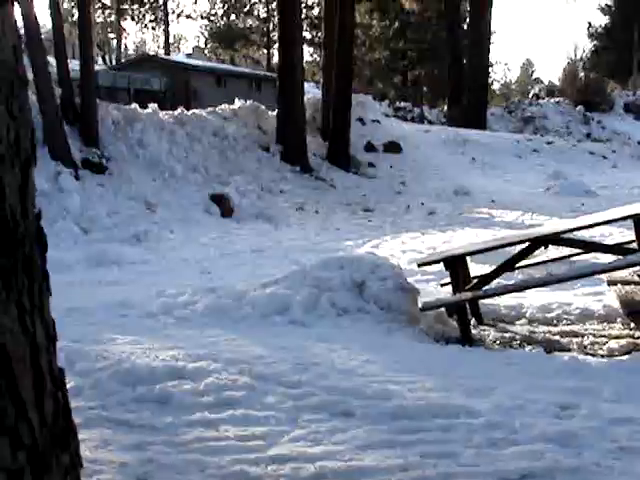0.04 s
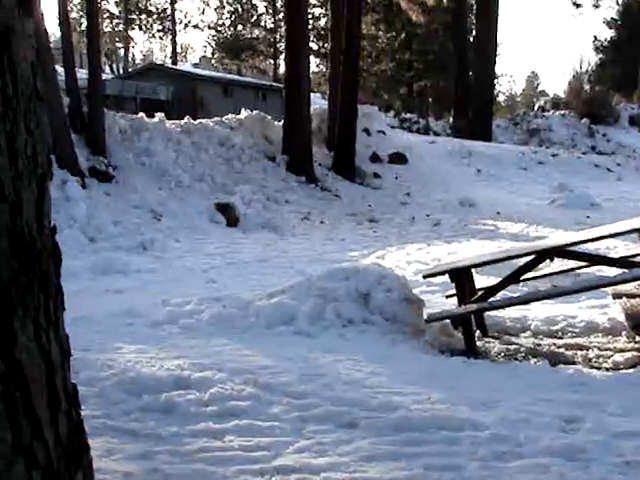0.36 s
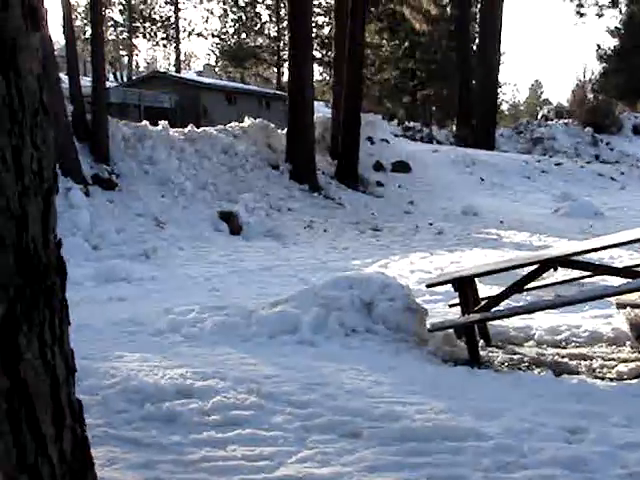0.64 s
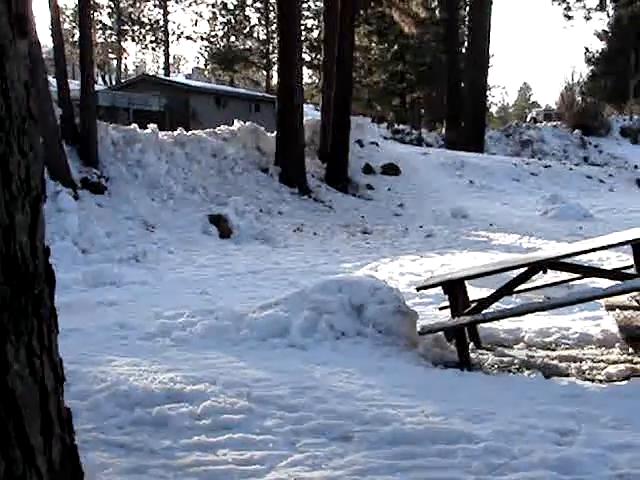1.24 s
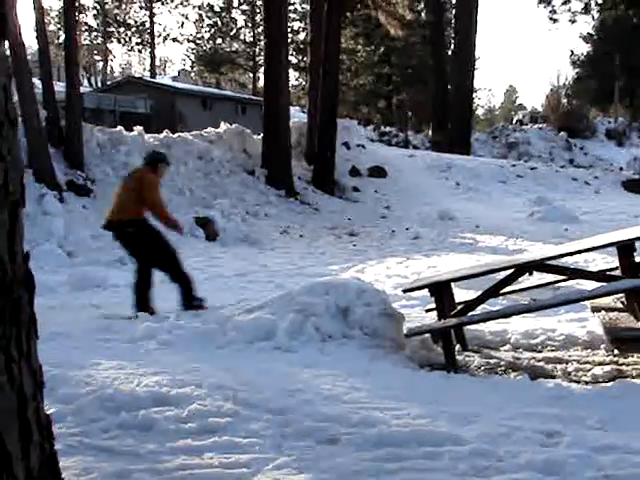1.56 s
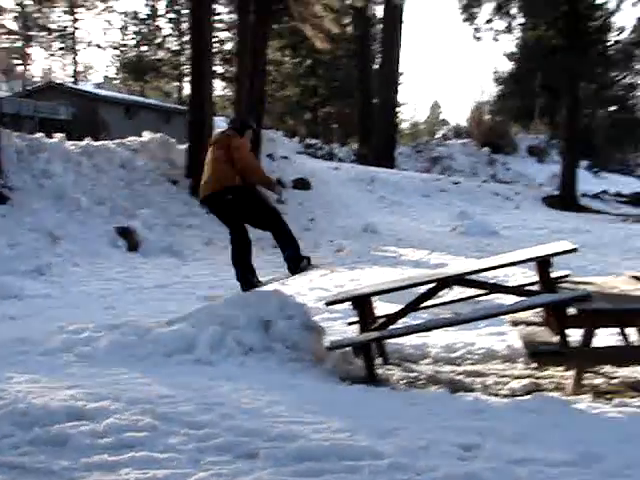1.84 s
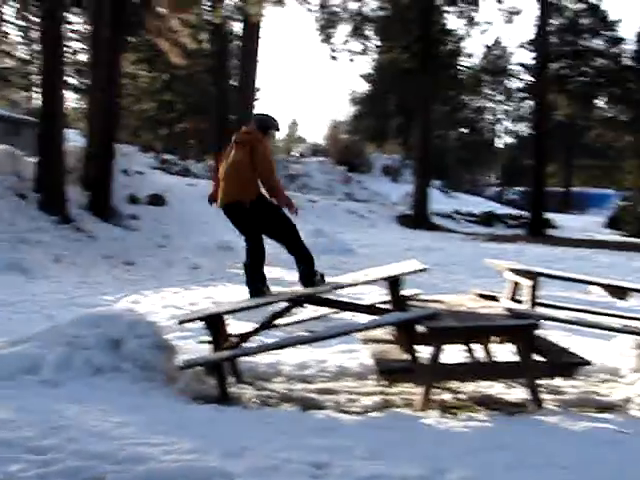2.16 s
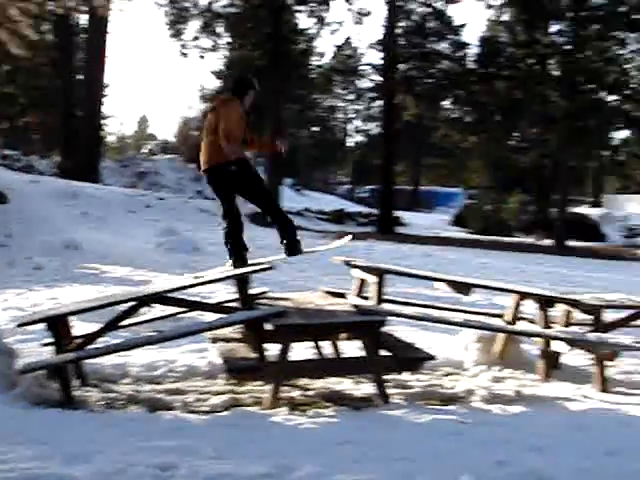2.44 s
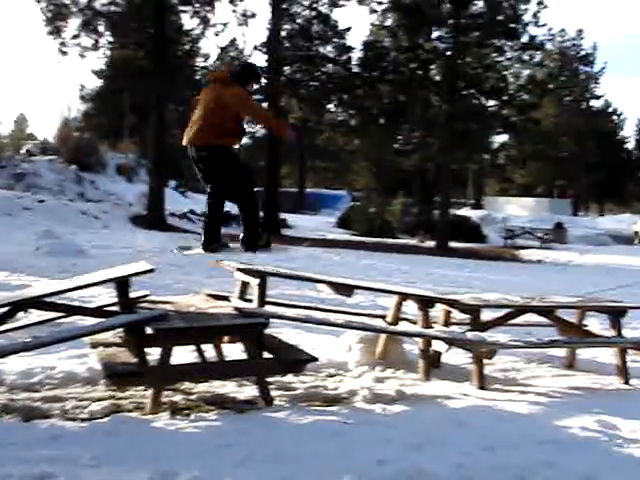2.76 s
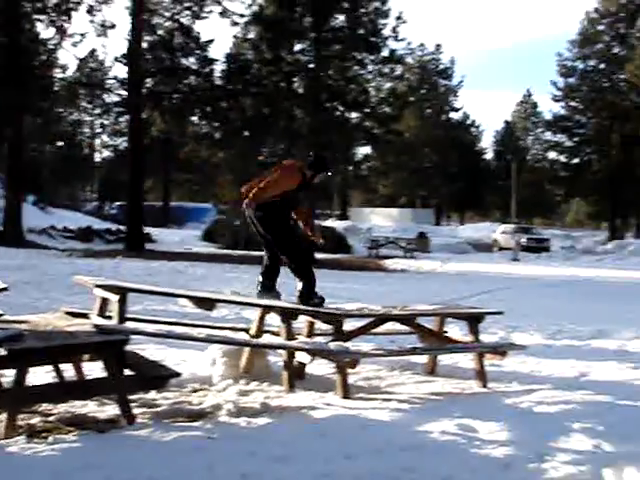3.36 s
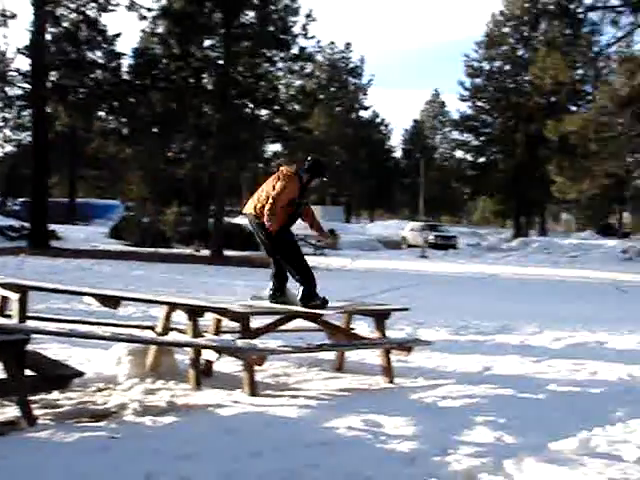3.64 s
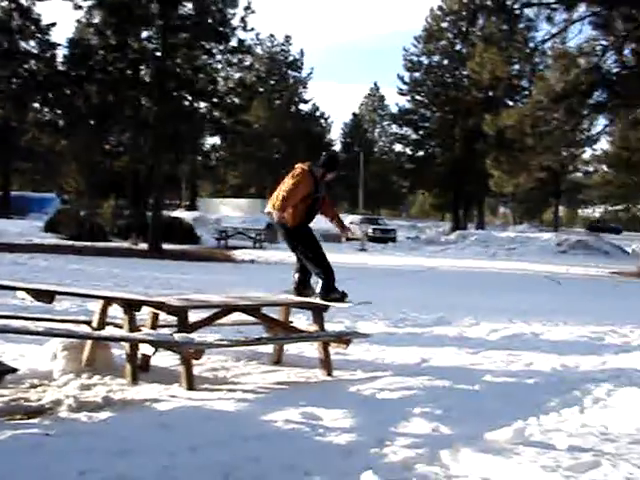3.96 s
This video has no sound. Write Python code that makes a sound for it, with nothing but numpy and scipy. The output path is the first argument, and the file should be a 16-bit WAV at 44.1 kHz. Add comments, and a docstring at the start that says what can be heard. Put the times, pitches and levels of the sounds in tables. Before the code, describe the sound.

A snowboard scrapes over crusty snow, then slaps onto wooden tables and grinds along them.

```python
"""A snowboard slaps down on a wooden picnic table, slides along it, hops to a second and grinds over its
rattling planks: the base sticks and slips, the edge rasps, the wood rings. Before that it crumbles
crusty snow on the run-in and scrapes up a kicker's icy lip. Outdoors, with a steady rush behind,
on one small mono recorder that overloads on the landing."""
import sys
import numpy as np
from scipy import signal
from scipy.fft import rfft, irfft
from scipy.io import wavfile

SR = 44100
rng = np.random.default_rng(int(sys.argv[2]) if len(sys.argv) > 2 else 0)


def wrap_up_sound(samples):
    """Save the sound to the file named by the first command line argument, as 16-bit audio."""
    columns = np.atleast_2d(samples).T
    # keep every value between -1 and 1, then stretch to whole-number steps
    tamed = np.clip(columns, -1, 1)
    steps = np.round(tamed * 32767).astype(np.int16)
    wavfile.write(sys.argv[1], SR, steps)


N = 176400
T = np.arange(N) / SR
ATTACK_S, JUDDER_HZ = .002, 36.7
GRAINS_PER_S, SNOW_GRAIN_DB, WOOD_GRAIN_DB = 12000, 3.5, 2.5


def from_db(db):
    """Decibels to gain."""
    return 10 ** (np.asarray(db) / 20)


def rms_one(x):
    """Scale to unit rms."""
    return x / np.sqrt(np.mean(x ** 2) + 1e-20)


def level(rows):
    """Gain over time from rows of t/s, level/dB."""
    s, db = np.transpose(rows)
    return from_db(np.interp(T, s, db))


def colour(x, spectrum):
    """Shape a signal by rows of f/Hz, relative level/dB; rms 1."""
    hz, db = np.transpose(spectrum)
    f = np.maximum(np.arange(N // 2 + 1) * SR / N, 1)
    skirts = np.minimum(1, f / hz[0]) * np.minimum(1, hz[-1] / f) ** 2
    gain = from_db(np.interp(np.log(f), np.log(hz), db))
    return rms_one(irfft(rfft(x) * skirts * gain, N))


def noise(spectrum):
    """Coloured noise; rms 1."""
    return colour(rng.standard_normal(N), spectrum)


def drift(rate_hz):
    """Random wavering, mostly slower than the rate; rms 1."""
    f = np.arange(N // 2 + 1) * SR / N
    return rms_one(irfft(rfft(rng.standard_normal(N)) / (1 + (f / rate_hz) ** 2), N))


def grains(spread_db):
    """Dense tiny fractures and slips of uneven size; rms 1."""
    sizes = from_db(spread_db * np.minimum(rng.exponential(1, N), 5)) * rng.choice([-1, 1], N)
    return rms_one(sizes * (rng.random(N) < GRAINS_PER_S / SR))


def burst(s, hold, decay):
    """Envelope: quick attack, hold, exponential release."""
    return np.clip((T - s) / ATTACK_S, 0, 1) * np.exp(-np.maximum(T - s - hold, 0) / decay)


def swell(s, length):
    """Smooth rise and fall around a moment."""
    return np.exp(-2 * ((T - s) / length) ** 2)


def ring(force, modes, ring_db=-8.5):
    """Contact force plus the ringing of the body that it drives."""
    out = force.copy()
    for hz, db, t60 in modes:
        r = np.exp(-np.log(1000) / (t60 * SR))
        zeros = np.array([1, 0, -1]) * (1 - r * r) / 2
        poles = [1, -2 * r * np.cos(2 * np.pi * hz / SR), r * r]
        out += from_db(db + ring_db) * signal.lfilter(zeros, poles, force + 1e-18)
    return out / (1 + from_db(ring_db) / 5)


# Open air behind the rider, and wind right on the microphone: f/Hz, level/dB
AIR_SPECTRUM = [(30, -20), (90, -15.5), (200, -21.5), (350, -9.5), (480, -7), (830, 1), (1380, -3.5),
                (2000, -9), (2700, -17.5), (4000, -26.5), (5500, -45), (8000, -58), (10000, -55)]
WIND_SPECTRUM = [(25, -1), (60, -3), (110, -15), (250, -30)]
# Gusts at the microphone: t/s, level/dB
GUST_LEVEL = [(2.165, -80), (2.18, -34), (2.2, -34), (2.25, -87), (3.41, -76), (3.46, -43), (3.485, -45),
              (3.52, -40.5), (3.57, -47), (3.65, -44), (3.73, -51), (3.78, -45), (3.89, -45), (3.93, -71)]
def air():
    """A steady outdoor rush, and low puffs that buffet the microphone."""
    rush = noise(AIR_SPECTRUM) * from_db(-31.5 + 1.5 * drift(rate_hz=31))
    buffeting = noise(WIND_SPECTRUM) * level(GUST_LEVEL) * from_db(3.4 * drift(rate_hz=13))
    return rush + buffeting


# Ticks close to the microphone: t/s, level/dB, decay/s
CLOSE_TICKS = [(0.114, -30.5, 0.00035), (0.1486, -12.5, 0.00034)]
# Their partials: f/Hz
TICK_PARTIALS = [1800, 3900, 6330]
def ticks():
    """Very short dry snaps."""
    out = 0
    for s, db, decay in CLOSE_TICKS:
        age = np.maximum(T - s, 0)
        tone = sum((-1) ** k * np.sin(2 * np.pi * hz * age) for k, hz in enumerate(TICK_PARTIALS))
        out = out + from_db(db) * np.exp(-age / decay) * tone
    return out


# Crust on the run-in, soft snow, the kicker's lip, the flexing board: f/Hz, level/dB
CRUST_SPECTRUM = [(60, -35), (170, -12.5), (330, -10.5), (650, -0.5), (1300, -1.5), (2200, -1.5),
                  (3600, -3.5), (4400, -5.5), (5800, -8), (8000, -14), (10000, -23)]
SCUFF_SPECTRUM = [(300, -21), (650, -3.5), (1400, 0.5), (2100, 2), (4000, -16)]
LIP_SPECTRUM = [(150, -17), (450, -9), (700, 3), (1250, -2), (2000, -20), (3600, -6.5), (4500, -18.5),
                (10000, -34)]
RUMBLE_SPECTRUM = [(80, -15), (120, -6), (172, -2), (230, -6.5), (400, -11), (900, -44)]
# Push on the crust and the lip, spray between the tables, rumble over lumps and planks: t/s, level/dB
CRUST_PUSH = [(.47, -49.5), (.5, -32), (.56, -41), (.65, -34.5), (.79, -38.5), (.89, -33.5), (1.1, -34.5),
              (1.23, -29), (1.7, -30), (1.85, -26.5), (1.92, -35.5), (1.97, -37), (2.06, -26.5),
              (2.13, -35), (2.155, -45), (2.18, -84)]
ICE_PUSH = [(1.99, -61), (2.03, -42), (2.07, -27), (2.13, -22), (2.16, -45), (2.18, -87)]
SPRAY_LEVEL = [(2.7, -84), (2.74, -47), (2.81, -47), (2.825, -37), (2.92, -33.5), (2.95, -41.5),
               (2.98, -74)]
BOARD_RUMBLE = [(.6, -45), (.72, -36), (.8, -62), (.88, -34), (.99, -41), (1.1, -52), (1.25, -35),
                (1.35, -44.5), (1.47, -38.5), (1.7, -48), (1.85, -35.5), (1.95, -56), (2.08, -46),
                (2.17, -66), (3.3, -64), (3.6, -38.5), (3.67, -30.5), (3.76, -46), (3.9, -59)]
# Patches of softer snow on the run-in: t/s, level/dB, length/s
SOFT_PATCHES = [(0.6, -32, 0.062), (0.947, -34, 0.076), (1.284, -33, 0.19)]
# Ringing of the steel edge on the crust and of the board on the lip: f/Hz, level/dB, t60/s
STEEL_MODES = [(2670, 2, 0.035)]
DECK_MODES = [(716, -7, .03), (900, -4, .04), (1130, -4, .05), (1280, -1, .06), (2780, -2, .05),
              (3550, 3, .02)]
def snow_ride():
    """The juddering board crumbles crust, throws spray, ploughs soft snow, scrapes ice and rumbles."""
    hiss = ring(colour(grains(SNOW_GRAIN_DB), CRUST_SPECTRUM) * level(CRUST_PUSH), STEEL_MODES)
    spray = colour(grains(SNOW_GRAIN_DB), CRUST_SPECTRUM) * level(SPRAY_LEVEL)
    ploughing = sum(from_db(db) * swell(s, length) for s, db, length in SOFT_PATCHES)
    scuffs = colour(grains(spread_db=2.5), SCUFF_SPECTRUM) * ploughing
    lip = ring(colour(grains(SNOW_GRAIN_DB), LIP_SPECTRUM) * level(ICE_PUSH), DECK_MODES)
    rumble = noise(RUMBLE_SPECTRUM) * level(BOARD_RUMBLE)
    judder = from_db(1.1 * drift(JUDDER_HZ))
    return (hiss + spray + scuffs + lip + rumble) * judder


# Drops along the run-in: t/s, level/dB, hold/s, decay/s, crunch/dB
SNOW_DROPS = [(.043, -27.5, 0.0051, 0.035, -44.5), (0.063, -32, 0.0041, 0.062, -48),
              (0.4788, -18, 0.0087, 0.016, -33.5), (0.696, -25.5, 0.0064, 0.041, -54),
              (0.85, -30.5, 0.01, 0.048, -55), (1.732, -23, 0.0042, 0.0027, -28.5)]
# Their dull body: f/Hz, level/dB
THUMP_SPECTRUM = [(60, -11.5), (160, -10.5), (230, -14), (320, 4.5), (440, -4.5), (600, -2), (1100, -8.5),
                  (1800, -14.5), (5000, -34)]
def snow_thumps():
    """The board drops on packed snow: a dull thump and a crunch."""
    body = noise(THUMP_SPECTRUM)
    crunch = colour(grains(SNOW_GRAIN_DB), CRUST_SPECTRUM)
    return sum((body * from_db(db) + crunch * from_db(crunch_db)) * burst(s, hold, decay)
               for s, db, hold, decay, crunch_db in SNOW_DROPS)


# The board taking the rider's weight; loose planks on the second table: t/s, level/dB, f/Hz, decay/s
BOARD_FLEXES = [(.482, -20.5, 338, 0.024), (.486, -27, 720, 0.004), (1.728, -23.5, 197, 0.0056),
                (2.959, -15, 243, 0.0054), (2.966, -18, 420, 0.0092)]
PLANK_CLACKS = [(3.003, -19, 1304, .013), (3.072, -15.5, 910, .005), (3.457, -12.5, 778, 0.0086),
                (3.516, -13, 1440, .012), (3.53, -10, 677, 0.0055), (3.638, -12.5, 1375, .009),
                (3.654, -12, 640, .011)]
def swings(rows):
    """A few heavily damped swings of the loaded board or of a struck plank."""
    return sum(from_db(db) * burst(s, ATTACK_S, decay) * np.sin(2 * np.pi * hz * (T - s))
               for s, db, hz, decay in rows)


# The edge catching, on the snow and on the tables: t/s, level/dB, length/s, f/Hz
EDGE_CATCHES = [(1.27, -31, .045, 1490), (1.84, -34, 0.035, 3860), (2.39, -27, 0.023, 2920),
                (2.706, -29.5, 0.031, 2650), (3.218, -22.5, 0.026, 2420), (3.223, -23, 0.014, 1840),
                (3.345, -20, 0.013, 2510), (3.383, -22, 0.023, 2234), (3.878, -21, 0.052, 2540)]
def squeaks():
    """The edge sticks and slips in brief, rough tones that swell and fade."""
    out = 0
    for s, db, length, hz in EDGE_CATCHES:
        rough_tone = np.sqrt(2) * drift(rate_hz=170) * np.sin(2 * np.pi * hz * T)
        out = out + from_db(db) * swell(s, length) * rough_tone
    return out


# Ringing wood of each picnic table: f/Hz, level/dB, t60/s
FIRST_TABLE_MODES = [(177, 6, .16), (425, -5, .08), (500, 4, .09), (623, 6, .12), (901, 2, .1),
                     (1083, -2, .1), (1452, -2, .12), (1680, -4, .04), (2438, -2, .12), (3500, -3, .03)]
SECOND_TABLE_MODES = [(162, 6.5, 0.25), (354, 5.5, 0.12), (610, -9.5, 0.038), (694, -2, 0.2),
                      (1030, 3.5, 0.2), (1440, 1, 0.22), (1808, 4.5, 0.03), (3500, -12, 0.022),
                      (4100, -4, 0.16), (5130, 1, 0.011)]
HOP_S = 2.85   # the rider is between the tables
def tables(force, ring_db):
    """A force drives whichever table is under the board."""
    first = ring(force * (T < HOP_S), FIRST_TABLE_MODES, ring_db)
    second = ring(force * (T >= HOP_S), SECOND_TABLE_MODES, ring_db)
    return first + second


# One landing on each table: t/s, level/dB, contact/s
LANDINGS = [(2.176, -5.5, 0.0009), (2.9607, -12, 0.00028)]
def slaps():
    """One short push as the flat base meets the planks."""
    return -sum(from_db(db) * np.sin(np.pi * np.clip((T - s) / contact, 0, 1))
                for s, db, contact in LANDINGS)


# Blows on the table tops: t/s, level/dB, hold/s, decay/s, treble corner/Hz, thud/dB
TABLE_BLOWS = [(2.1766, -9, 0.014, 0.006, 3000, -16), (2.2, -17, 0.0083, 0.021, 2000, -21),
               (2.239, -18.5, 0.012, 0.0037, 3500, -30), (2.9587, -16, 0.0079, 0.005, 6000, -25.5),
               (3.067, -20, 0.0068, 0.03, 2500, -33), (3.219, -23.5, .03, 0.031, 3000, -40.5),
               (3.444, -20.5, 0.021, 0.024, 1200, -34), (3.503, -17, 0.037, 0.011, 2400, -31),
               (3.585, -17.5, 0.0097, 0.017, 3500, -39), (3.624, -16.5, 0.043, 0.011, 1790, -39)]
# Clatter on top, and each table's frame below: f/Hz, level/dB
CLATTER_SPECTRUM = [(70, -11.5), (260, -20.5), (480, 0.5), (650, 4.5), (1100, 4), (1600, 1), (2400, -1),
                    (3500, -2), (4600, -10.5), (7000, -11.5), (10000, -24)]
FIRST_FRAME = [(90, -23), (175, -11), (250, -5), (400, -8), (490, 1.5), (900, -17)]
SECOND_FRAME = [(100, -15), (170, -1.5), (290, -0.5), (390, 3.5), (500, -16), (900, -30)]
def table_knocks():
    """Slaps and short clatters of contacts ring the planks, over a thud of the frame."""
    clatter = colour(grains(spread_db=3.5), CLATTER_SPECTRUM)
    frame = np.where(T < HOP_S, noise(FIRST_FRAME), noise(SECOND_FRAME))
    force, thud = 0, 0
    for s, db, hold, decay, corner_hz, thud_db in TABLE_BLOWS:
        softened = rms_one(signal.lfilter(*signal.butter(1, corner_hz, fs=SR), clatter))
        force = force + softened * from_db(db) * burst(s, hold, decay)
        thud = thud + frame * from_db(thud_db) * burst(s, hold, 2.1 * decay)
    return tables(force + slaps(), ring_db=.99) + thud


def rasp(slips_per_s=170, low_hz=1500, high_hz=2900, t60_s=.03):
    """The edge chatters on wood, each slip ringing briefly at a random pitch; rms 1."""
    pitches = np.geomspace(low_hz, high_hz, 20)
    slips = (rng.random(N) < slips_per_s / SR) * rng.uniform(.95, 1, N)
    pitch_index = rng.integers(0, len(pitches), N)
    r = np.exp(-np.log(1000) / (t60_s * SR))
    out = 0
    for k, w in enumerate(2 * np.pi * pitches / SR):
        poles = [1, -2 * r * np.cos(w), r * r]
        out = out + signal.lfilter([np.sin(w)], poles, slips * (pitch_index == k) + 1e-18)
    return rms_one(out)


# Push of the board along each table: t/s, level/dB
FIRST_SLIDE_PUSH = [(2.17, -83), (2.18, -28), (2.25, -23), (2.33, -27.5), (2.39, -24.5), (2.47, -26.5),
                    (2.5, -26), (2.57, -31), (2.71, -24.5), (2.735, -50), (2.76, -78)]
SECOND_SLIDE_PUSH = [(2.955, -70), (2.968, -19.5), (3.01, -22), (3.06, -25.5), (3.15, -20.5), (3.23, -19),
                     (3.27, -24), (3.33, -25.5), (3.39, -20), (3.46, -19.5), (3.56, -23.5), (3.62, -23),
                     (3.72, -18), (3.84, -20), (4.0, -21.5)]
# Grinding on each table top: f/Hz, level/dB
FIRST_SLIDE_SPECTRUM = [(60, -18), (200, -12.5), (450, -10), (700, -5), (1500, 0), (2200, -2), (3000, -1.5),
                        (4400, -9.5), (5800, -11), (8000, -20), (10000, -28.5)]
SECOND_SLIDE_SPECTRUM = [(60, -32), (170, -17.5), (350, -9.5), (460, -12.5), (680, 0.5), (900, -2.5),
                         (1200, 2), (1800, 1.5), (2600, -0.5), (3500, -2.5), (4400, -9.5), (5600, -14.5),
                         (8000, -23), (10000, -33)]
def table_slides(brighten_from_s=2.57, tilt_db_per_oct=3, rasp_db=-6):
    """The base sticks and slips over the planks; the second slide thins as the board runs out."""
    first = colour(grains(WOOD_GRAIN_DB), FIRST_SLIDE_SPECTRUM) * level(FIRST_SLIDE_PUSH)
    slips = grains(WOOD_GRAIN_DB)
    dull, bright = (colour(slips, [(hz, db + tilt * np.log2(hz)) for hz, db in SECOND_SLIDE_SPECTRUM])
                    for tilt in (-tilt_db_per_oct, tilt_db_per_oct))
    blend = np.clip(T - brighten_from_s, 0, 1)   # one-second crossfade
    second = (dull * (1 - blend) + bright * blend + from_db(rasp_db) * rasp()) * level(SECOND_SLIDE_PUSH)
    judder = from_db(1.5 * drift(JUDDER_HZ))
    return tables((first + second) * judder, ring_db=-8.5)


def scene():
    """Air, snow and tables all reach one microphone."""
    mono = air() + snow_ride() + snow_thumps() + table_slides() + table_knocks()
    mono += swings(BOARD_FLEXES) + swings(PLANK_CLACKS) + squeaks() + ticks()
    return np.array([mono, mono])


def low_pass(x, hz):
    """Steep cut of the treble."""
    return signal.sosfilt(signal.ellip(12, .1, 70, hz, fs=SR, output="sos"), x)


def record(dry, start_s=.0415, full_scale=.72):
    """The recorder opens, overloads unevenly, cuts the top and clips any overshoot at its output."""
    opened = dry * np.clip((T - start_s) / ATTACK_S, 0, 1)
    overloaded = low_pass(np.clip(opened, -.70, .53), hz=10050)
    return low_pass(np.clip(overloaded, -full_scale, full_scale), hz=15800)


dry = scene()
out = record(dry)
wrap_up_sound(out)
```